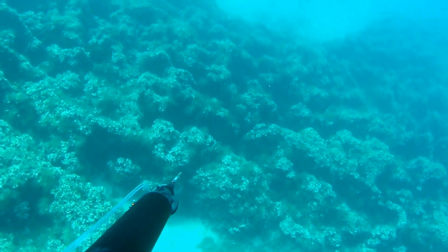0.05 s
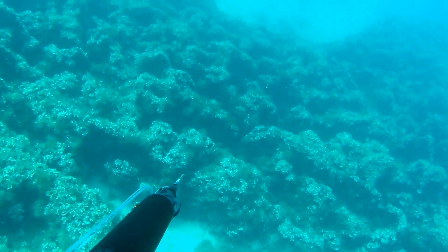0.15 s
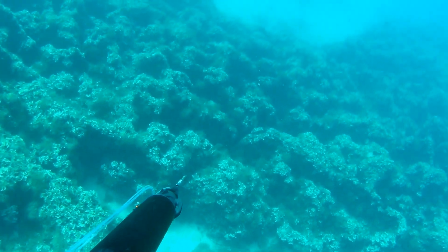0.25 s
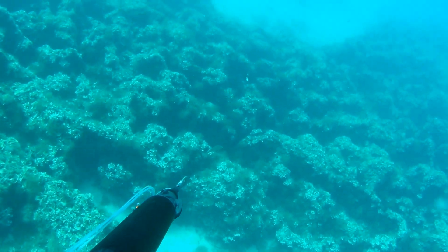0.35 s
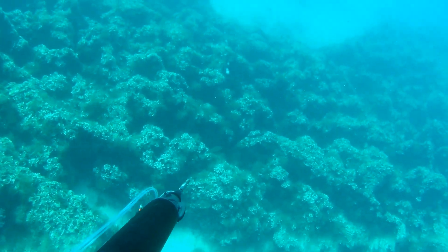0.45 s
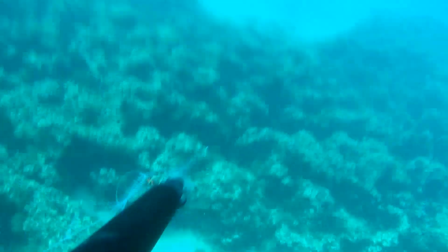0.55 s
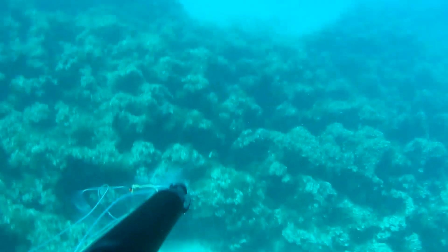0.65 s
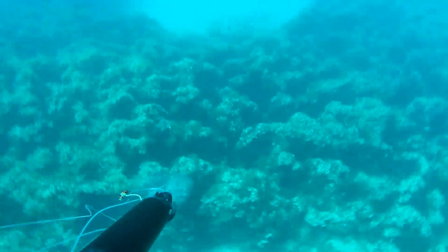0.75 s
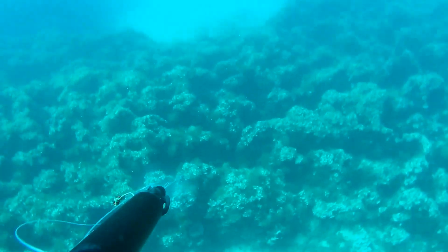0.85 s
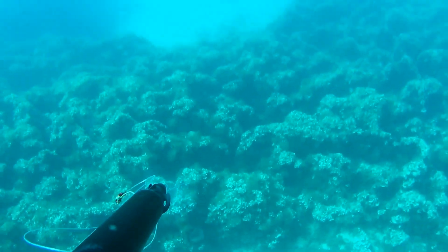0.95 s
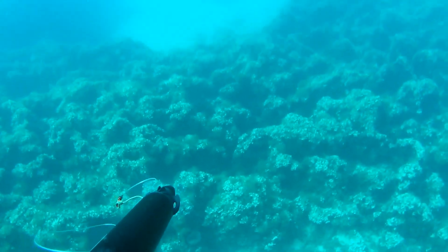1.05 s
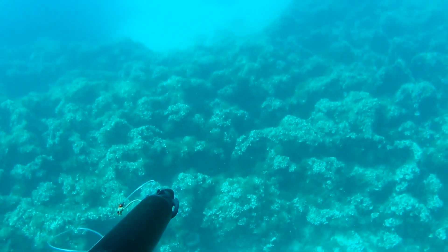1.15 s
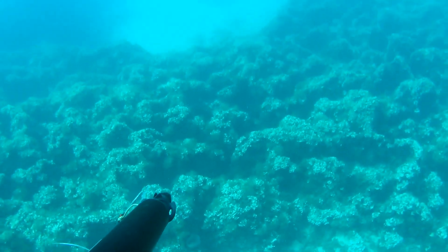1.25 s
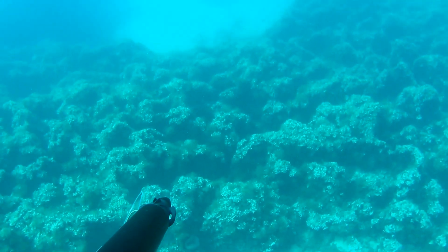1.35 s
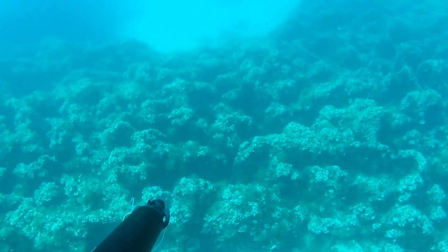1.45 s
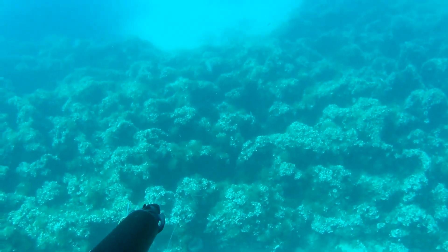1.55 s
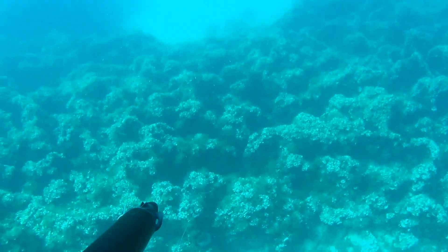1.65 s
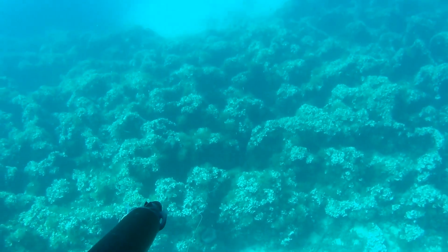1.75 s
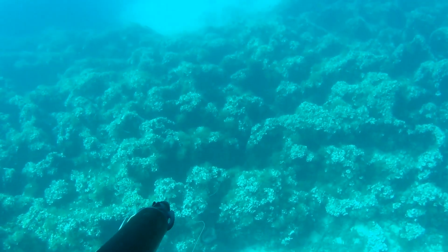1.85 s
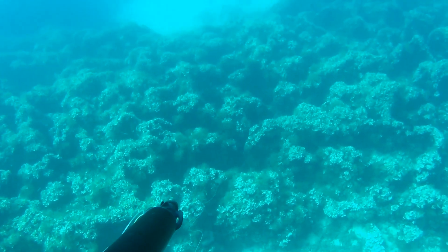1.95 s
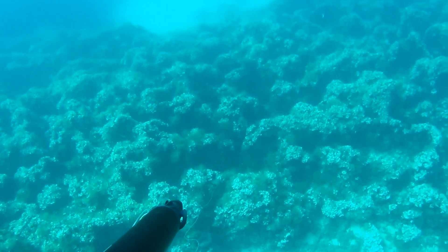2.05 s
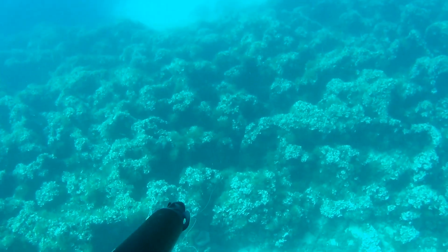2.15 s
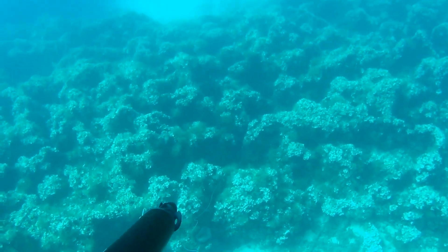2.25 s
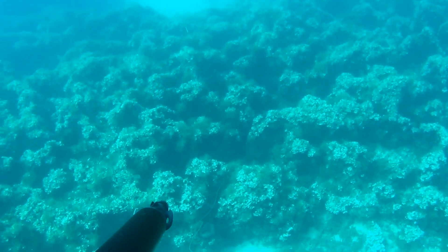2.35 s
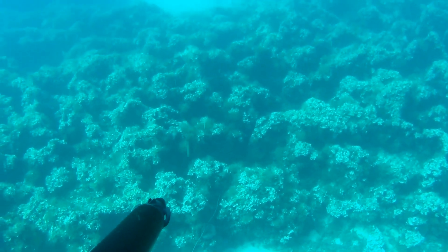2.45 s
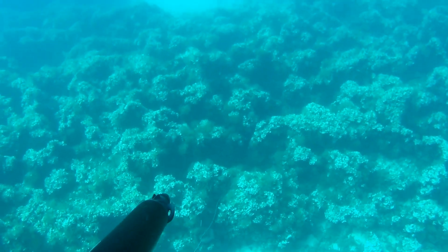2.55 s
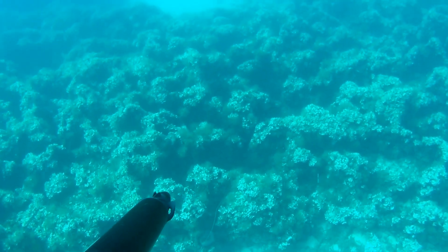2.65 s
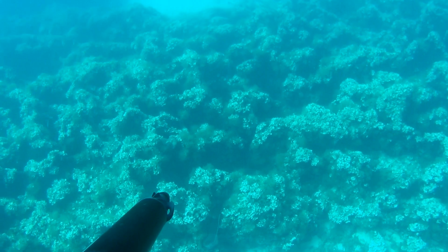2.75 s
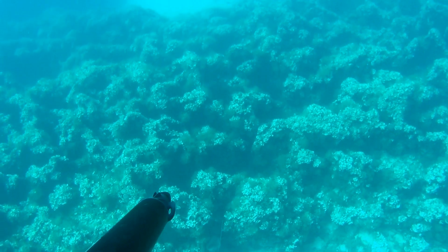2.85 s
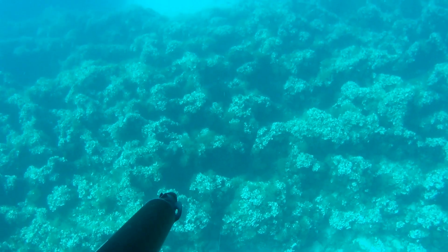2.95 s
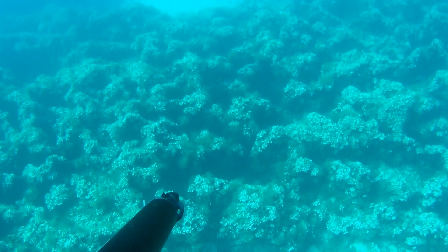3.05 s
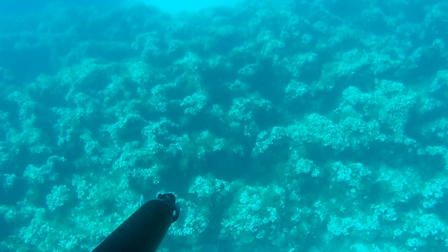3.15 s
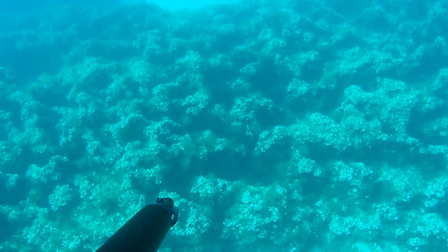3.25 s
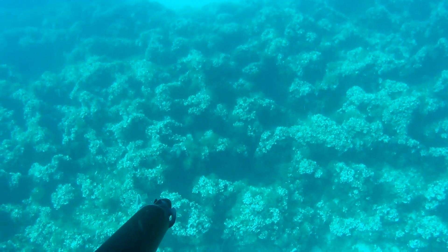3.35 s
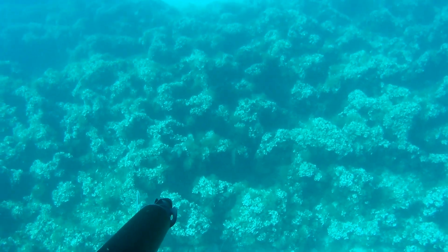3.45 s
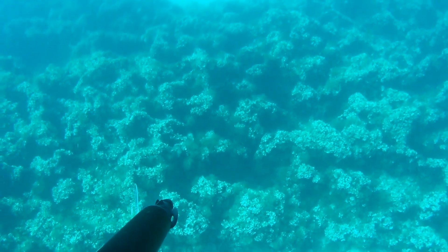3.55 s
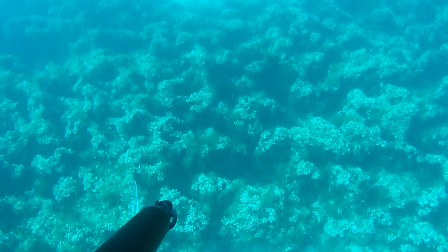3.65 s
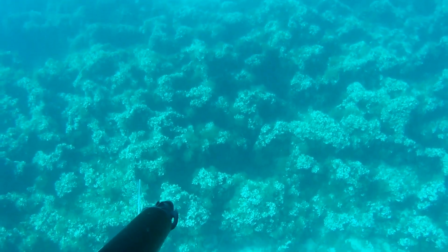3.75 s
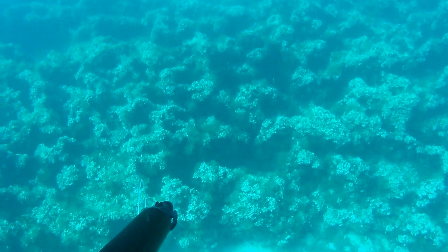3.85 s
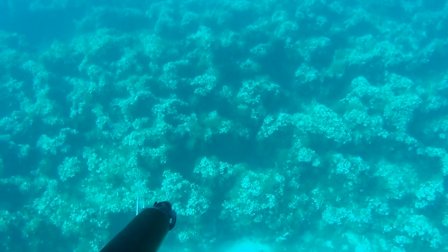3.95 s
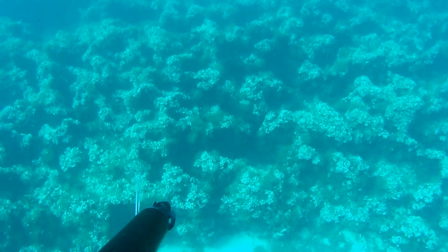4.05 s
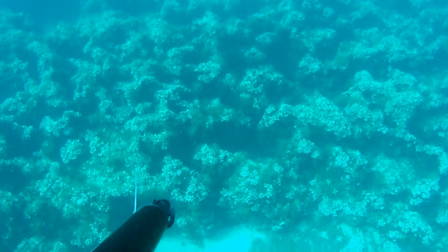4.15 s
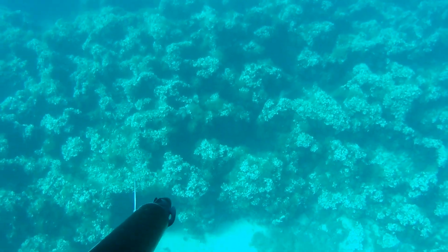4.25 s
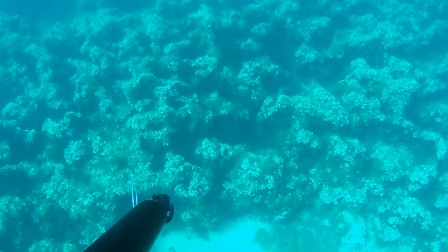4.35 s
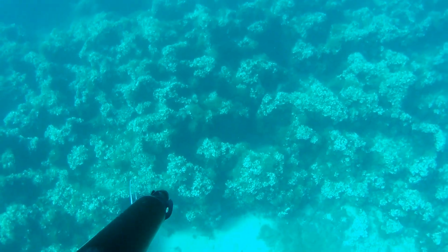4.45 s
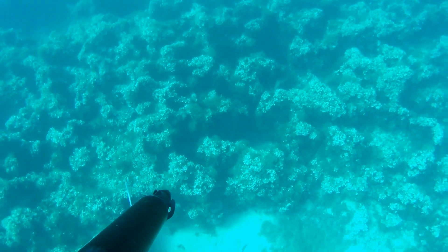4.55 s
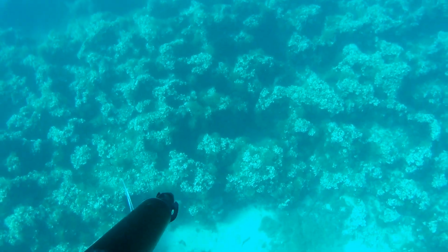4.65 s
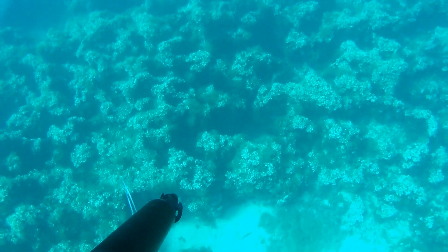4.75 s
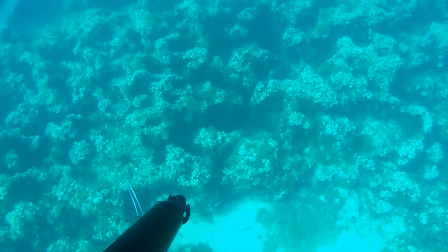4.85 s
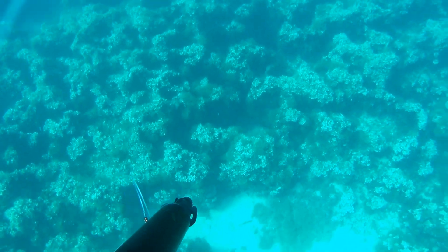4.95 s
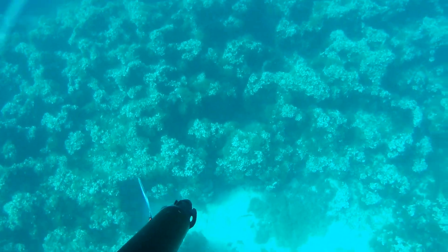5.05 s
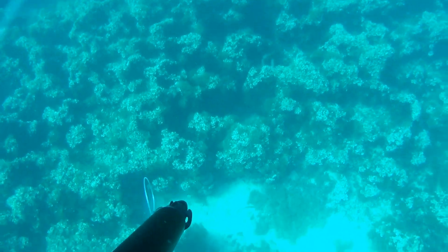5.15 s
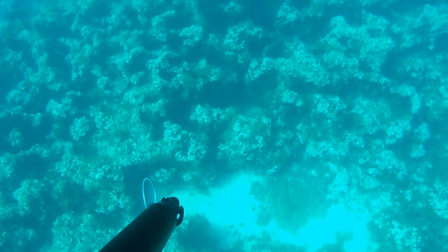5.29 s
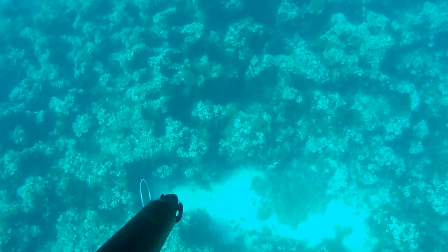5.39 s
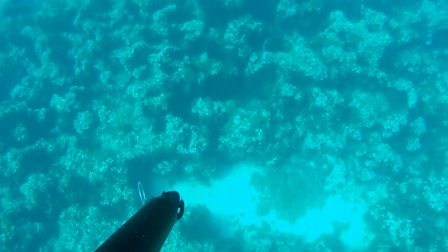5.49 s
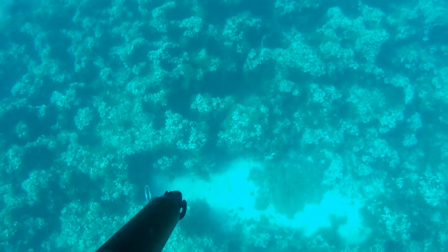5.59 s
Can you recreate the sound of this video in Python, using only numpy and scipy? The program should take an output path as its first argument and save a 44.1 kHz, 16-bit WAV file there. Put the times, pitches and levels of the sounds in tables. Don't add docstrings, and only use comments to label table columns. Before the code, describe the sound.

Underwater, a speargun fires with a heavy, loud clack and brief metallic ring, then a smaller snap, leaving quiet rumble, gurgles and crackling.

```python
import sys
import numpy as np
from scipy import signal
from scipy.io import wavfile
from scipy.ndimage import uniform_filter1d

SR = 44100
rng = np.random.default_rng(int(sys.argv[2]) if len(sys.argv) > 2 else 0)


def volts_from_decibels(level):
    exponent = np.asarray(level, float) / 20
    return 10 ** exponent


def output_pcm(signal):
    pcm = np.clip(np.atleast_2d(signal).T, -1, 1) * 32767
    wavfile.write(sys.argv[1], SR, np.round(pcm).astype(np.int16))


N = 247842
EDGE_HZ = 11250

# frequency in Hz, likeness from 0 to 1,
# phase lead of the right in radians, left-right level in dB.
PORT_PAIR = [(40, .7, -.9, -3), (120, .5, -.3, -2), (240, .5, 1.3, 1), (500, .6, 2.9, 1),
             (1250, .6, 2.9, 1), (1700, .8, 6.1, -1), (2400, .2, 6.3, 1), (4200, .3, 5, 1),
             (5400, .7, 4.9, 1.5), (6300, .7, 5.4, 1), (6900, .7, 6.1, 1), (11000, .55, 6.3, 0)]


def evened(x):
    return x / np.sqrt(np.mean(x ** 2) + 1e-20)


def read(points, hz, axis=1):
    points = np.transpose(points)
    return np.interp(np.log(hz + 1), np.log(points[0] + 1), points[axis])


def curves(rows):
    s, *columns = np.transpose(rows)
    return [np.interp(np.arange(N) / SR, s, c) for c in columns]


def add(mix, s, sound):
    part = mix[:, round(s * SR):][:, :sound.shape[1]]
    part += sound[:, :part.shape[1]]


def sides(pan_db):
    return volts_from_decibels(np.array([[pan_db / 2], [-pan_db / 2]]))


def mode(hz, t60, rise, length=.1, apart=1.0, ahead=0):
    t = np.arange(round(length * SR)) / SR
    port_phase = np.angle(np.exp(1j * read(PORT_PAIR, hz, axis=2)))
    lead = np.array([[0], [ahead + apart * port_phase]])
    envelope = volts_from_decibels(-60 * t / t60) * (1 - np.exp(-t / rise))
    return np.sin(2 * np.pi * hz * t + lead) * envelope


def noise(colour, length=N, size=1024, patchy_db=1.5):
    frames = 4 * length // size + 5
    hz = np.fft.rfftfreq(size, 1 / SR)
    hz = hz[hz < min(colour[-1][0], EDGE_HZ + SR / 50)]
    a, b, c, d, patches = rng.standard_normal((frames, len(hz), 5), dtype=np.float32).T
    patches = uniform_filter1d(patches, size=6, axis=0)
    patches = evened(uniform_filter1d(patches, size=8, axis=1))
    same = np.clip(read(PORT_PAIR, hz), 0, .95)[:, None]
    turn = np.exp(1j * read(PORT_PAIR, hz, axis=2))[:, None]
    tilt = volts_from_decibels(read(PORT_PAIR, hz, axis=3) / 2)[:, None]
    left = a + 1j * b
    right = same * turn * left + np.sqrt(1 - same ** 2) * (c + 1j * d)
    z = np.array([left * tilt, right / tilt])
    z *= volts_from_decibels(read(colour, hz)[:, None] + patchy_db * patches) / np.sqrt(1 + same * turn.real)
    z = np.pad(z, ((0, 0), (0, size // 2 + 1 - len(hz)), (0, 0)))
    pair = signal.istft(z, nperseg=size, noverlap=3 * size // 4)[1][:, :length]
    return pair / pair.mean(0).std()


def narrowed(pair, width):
    middle = pair.mean(0)
    return middle + width * (pair - middle)


def strokes(rows):
    s, db, hold, t60 = np.transpose(rows)[:, :, None]
    t = np.arange(2 * SR) / SR - s
    rise_db = 2202 * np.maximum(-t, 0)
    fall_db = 60 * np.maximum(t - hold, 0) / t60
    return volts_from_decibels(db - rise_db - fall_db).sum(0)


def whine(rows, waver_hz, flutter_db):
    hz, db = curves(rows)
    drift = uniform_filter1d(uniform_filter1d(rng.standard_normal((2, N)), size=900), size=900)
    drift = drift / drift.std()
    turns = 2 * np.pi * np.cumsum(hz + waver_hz * drift[0]) / SR + np.array([[0], [-.4]])
    return volts_from_decibels(db + flutter_db * drift[1]) * np.sqrt(2) * np.cos(turns)


def motor():
    # time in seconds, pitch in Hz, level in dB.
    lower_tone = [(0, 1715, -72.5), (1, 1712, -79), (1.6, 1717, -75.5), (2.1, 1712, -75), (2.3, 1712, -80),
                  (2.65, 1715, -76), (3.1, 1710, -74), (3.27, 1718, -74), (3.5, 1705, -70),
                  (3.8, 1696, -67.5), (4.2, 1703, -70.5), (4.58, 1700, -71), (4.75, 1702, -79),
                  (5.2, 1710, -79), (5.62, 1708, -84)]
    # time in seconds, pitch in Hz, level in dB.
    upper_tone = [(0, 2342, -89), (3, 2310, -85), (4.2, 2350, -87), (5, 2313, -79), (5.62, 2380, -80)]
    return whine(lower_tone, 1.2, 1.102) + whine(upper_tone, 25., 2.5)


def water():
    # frequency in Hz, density in dB per Hz.
    rumble_colour = [(15, -23), (30, 2.5), (65, -3), (105, 0), (160, -11), (300, -32.5), (1000, -68)]
    swish_colour = [(80, -38), (150, -11), (220, 3.5), (290, -2.5), (400, -15), (700, -26), (2000, -61)]
    rustle_colour = [(250, -21.5), (420, -3), (700, -5.5), (1200, -2.5), (1500, -3), (2600, -15),
                     (4000, -41)]
    hiss_colour = [(180, -26), (300, 0.5), (642, -9.5), (725, -6.5), (1290, -15.5), (1680, -4), (1840, -13),
                   (2340, -10), (2530, -14.5), (4720, -17.5), (5330, -14.5), (10600, -21.5), (11400, -26),
                   (14800, -62.5), (22000, -120)]
    # time in seconds, effort in dB.
    motion = [(0, -1.5), (.4, 0.5), (.8, -6), (1.4, -2), (2.2, -2), (2.75, 0.5), (3.5, 1), (3.9, -1),
              (4.45, 3), (4.7, 2.5), (5.1, 3), (5.62, 7)]
    # middle in seconds, length in seconds,
    # rumble change in dB, swish change in dB.
    surges = [(.39, 0.027, 8, -3), (0.903, 0.081, 12.5, 8), (1.123, 0.12, 3.5, 1), (1.35, 0.036, -4.5, 3),
              (1.601, 0.041, 4.5, -0.5), (1.821, 0.037, 3.5, 0.5), (1.908, 0.036, 1.5, 3.5),
              (2.088, 0.075, 0, 2.5), (2.302, 0.056, 2.5, -5.5), (2.561, 0.044, 1, 0.5),
              (3.638, 0.072, -3, -0.5), (4.07, 0.05, -2.5, -5), (4.54, 0.089, 2, 5.5),
              (4.824, 0.032, -4, 0.5), (4.983, 0.055, -4, 2.5), (5.38, 0.062, 2.5, -1),
              (5.5, 0.057, 1.5, 4)]
    effort_db = curves(motion)[0]
    s, length, *lift_db = np.transpose(surges)
    t = np.arange(0, N / SR, .002)
    swells = np.exp(-((t - s[:, None]) / length[:, None]) ** 2)
    rumble_db, swish_db = curves(np.transpose([t, *np.dot(lift_db, swells)]))
    rumble = volts_from_decibels(-62.5 + 0.55 * effort_db + rumble_db) * noise(rumble_colour, size=2048, patchy_db=1.0)
    swish = volts_from_decibels(-67.5 + 1.2 * effort_db + swish_db) * noise(swish_colour, patchy_db=1.5)
    rustle = volts_from_decibels(-70 + 0.82 * effort_db) * noise(rustle_colour, size=512, patchy_db=3.0)
    hiss = volts_from_decibels(-67.35) * noise(hiss_colour, size=512, patchy_db=1.8)
    return rumble + swish + rustle + hiss


def gurgles():
    # middle in seconds, half length in seconds, pitch in Hz, level in dB.
    gurgle_rows = [(0.905, 0.026, 107, -55), (1.255, 0.034, 410, -66.5), (1.634, 0.054, 58, -59),
                   (1.833, 0.05, 95, -58.8), (1.891, 0.041, 351, -65.4), (1.918, 0.034, 208, -59.5),
                   (2.824, 0.028, 225.5, -55), (2.829, 0.036, 308, -62.5), (3.223, 0.028, 313, -66),
                   (3.624, 0.038, 303.7, -61), (3.662, 0.057, 258.0, -61), (4.061, 0.036, 269.0, -64.5),
                   (4.308, 0.026, 232, -60), (4.44, 0.064, 97.6, -57.7), (4.517, 0.097, 199.0, -62),
                   (4.56, 0.049, 276.5, -54.5), (4.747, 0.049, 500, -63), (4.777, 0.03, 110, -54.5),
                   (4.829, 0.05, 413, -65), (4.964, 0.039, 234.5, -64), (4.991, 0.046, 150, -63.5),
                   (4.991, 0.074, 308, -62.5), (5.223, 0.064, 280.0, -65), (5.28, 0.063, 152.8, -60.5),
                   (5.313, 0.023, 192, -57.5), (5.32, 0.07, 385, -70), (5.345, 0.076, 102.6, -58),
                   (5.49, 0.033, 459, -64.5), (5.512, 0.048, 103, -51.5), (5.485, 0.04, 265, -52),
                   (5.575, .045, 262, -52), (5.5, .03, 325, -55), (4.66, .04, 235, -60),
                   (4.77, .025, 690, -63), (5.597, 0.023, 420, -69.4)]
    out, t = np.zeros((2, N)), np.arange(-.3, .3, 1 / SR)
    chances = rng.uniform(-1.12, 1, (len(gurgle_rows), 2))
    for (s, half, hz, db), (c, d) in zip(gurgle_rows, chances):
        wobble = 0.84 * np.sin(2 * np.pi * (18.6 + 4.5 * c) * t + np.pi * d)
        lead = np.array([[0], [0.4 * read(PORT_PAIR, hz, axis=2)]])
        note = np.sin(2 * np.pi * hz * t + wobble + lead)
        add(out, s + t[0], volts_from_decibels(db) * np.exp(-(t / half) ** 2) * note)
    return out


def taps():
    # start in seconds, peak level in dB, pitch in Hz, t60 in seconds.
    tap_rows = [(1.261, -53, 710, 0.027), (1.263, -45, 1180, 0.021), (1.572, -42.5, 1260, 0.031),
                (1.875, -41.5, 350, 0.026), (2.552, -51, 1750, 0.038), (2.674, -48.5, 62, 0.094),
                (2.776, -50, 1520, .025), (3.221, -49.5, 1690, 0.031), (3.088, -45, 1590, 0.018),
                (3.2, -49.5, 1083, 0.055), (3.633, -46, 626, 0.041), (3.634, -44, 1850, 0.038),
                (3.835, -55, 725, 0.12), (4.25, -47.5, 1640, 0.055), (4.308, -52.5, 121, 0.046),
                (4.31, -52, 2280, 0.029), (4.488, -49, 1380, 0.032), (4.489, -43, 1760, 0.023),
                (4.611, -53.5, 247, 0.29), (4.68, -54, 533, 0.14), (4.729, -53, 572, 0.11),
                (4.769, -48.5, 680, 0.062), (4.77, -50, 494, 0.049), (4.814, -55.5, 430, 0.074),
                (5.01, -52, 727, 0.059), (5.051, -47, 1670, 0.035), (5.1, -49, 1310, .035),
                (5.238, -52, 1210, .02), (5.58, -53, 2300, .03), (5.599, -53, 1480, .04),
                (5.408, -38.5, 1470, 0.023), (5.481, -43, 1470, 0.062)]
    out = np.zeros((2, N))
    for (s, db, hz, t60), chance in zip(tap_rows, rng.uniform(-0.93, 1, (len(tap_rows), 4))):
        pitches = hz * (1 + 0.123 * (chance - chance.mean()))
        cluster = sum(mode(pitch, t60, 0.0023, length=0.14, apart=0.63) for pitch in pitches)
        add(out, s, volts_from_decibels(db - 7.0) * cluster)
    return out


def shrimp():
    # start in seconds, peak level in dB, low part in dB, middle part in dB.
    near_snaps = [(0.0688, -44.5, -9.5, -14), (.178, -45, -12, -16), (0.9657, -52.5, 8, 0.5),
                  (1.0148, -37.5, -18, -16.5), (1.0765, -45.5, -2.5, -11), (1.4842, -40.5, -24, -17),
                  (1.5277, -40.5, -6, -10.5), (1.6064, -43.5, -22, -15), (1.6735, -40, -9, -14),
                  (2.1063, -47, -16, -16.5), (2.2284, -44, -21.5, -14.5), (2.247, -40, -10.5, -17.5),
                  (2.279, -39.5, -12, -14), (2.471, -37.5, -8.5, -9.5), (2.942, -54, -7, -9),
                  (2.9588, -56, 10.5, 4), (3.076, -44, -1, -17.5), (3.2993, -49, -22, -13),
                  (3.3495, -43.5, -1, -11.5), (3.6776, -39.5, -4.5, -8), (3.731, -44.5, -7, -8.5),
                  (3.762, -40, -5.5, -16), (3.844, -46, -11, -14), (3.9696, -46, -16, -19),
                  (4.1468, -42, -18, -15), (4.3853, -47, -7, -22), (4.697, -46.5, -1, -10.5),
                  (4.7084, -39, -8, -14.5), (5.145, -41.5, -7, -16), (5.4817, -47.5, -8, -10.5)]
    # start in seconds, peak level in dB.
    dull_snaps = [(0.235, -49.5), (0.8586, -56), (1.342, -57.5), (1.426, -52), (1.643, -50.5),
                  (1.9323, -52), (2.3338, -50.5), (2.3391, -50), (2.4513, -58.5), (2.503, -52.5),
                  (2.611, -58), (2.697, -53.5), (2.775, -51.5), (2.8412, -53), (3.042, -57), (3.0807, -50),
                  (3.166, -56), (3.2651, -51), (4.063, -52.5), (4.246, -52), (4.4558, -59), (4.47, -50.5),
                  (4.892, -52.5), (5.238, -45.5), (5.5266, -55)]
    # start in seconds, peak level in dB,
    # low part in dB, middle part in dB, left-right level in dB.
    gun_ticks = [(.431, -35, 0, -16, 3), (.4755, -34, -16, -8, 3), (.5437, -34.5, -19, -11, 4),
                 (.6177, -37, -30, -14.5, 1), (.7097, -50, 1, -7, -2), (.7152, -31.5, -15, -25, 2),
                 (.7647, -48, -4, -14, -3)]
    # frequency in Hz, t60 in seconds, level in dB.
    shell_modes = [
        [(1150, 0.0028, 12), (1644, 0.014, 2), (2219, 0.0072, -1)],
        [(2750, 0.0078, 6), (3100, 0.0045, 5.5), (3520, 0.0054, 8), (3900, 0.0035, 5.5), (4240, 0.0037, 7)],
        [(5440, 0.006, 0.5), (6470, 0.0041, 3.5), (7650, 0.0021, 5), (9050, 0.0024, -7), (10200, 0.0037, -11)],
    ]
    reef_pan_db = 3.5
    far_per_s, far_db, far_spread_db = 84, -68, 5.5
    at, size, low, middle = rng.random((round(far_per_s * N / SR), 4)).T
    crackle_db = far_db - far_spread_db * np.log(size + 0.042)
    far = np.transpose([at * N / SR, crackle_db, 14.0 * low - 13., 11.0 * middle - 17., reef_pan_db + 0 * at])
    near = [(*row, reef_pan_db) for row in near_snaps]
    dull = [(*row, -1.5, -9, reef_pan_db) for row in dull_snaps]
    s, db, low_db, middle_db, pan_db = np.transpose([*gun_ticks, *near, *dull, *far])
    out = np.zeros((2, N))
    places = ((s + 0.00065) * SR).astype(int).clip(0, N - 1)
    for modes, part_db in zip(shell_modes, (low_db, middle_db, 0)):
        weights = rng.standard_normal((len(s), len(modes))).T
        for (hz, t60, level_db), c in zip(modes, weights):
            train = np.zeros((2, N))
            pulse_db = db - 0.57 + level_db + part_db + 1.7 * c
            train[:, places] = volts_from_decibels(pulse_db + np.outer([.5, -.5], pan_db))
            out += signal.oaconvolve(train, mode(hz, t60, 0.00053, length=0.079), axes=1)[:, :N]
    return out


def splash():
    # start in seconds, level in dB, hold in seconds, t60 in seconds.
    sprays = [
        (.505, -50, .01, .16),
        (.545, -57, .03, .18),
        (.632, -58, .02, .08),
        (.722, -55, .008, .09),
        (.74, -64, .02, .12),
    ]
    # frequency in Hz, density in dB per Hz.
    fizz_colour = [(400, -20), (900, -3), (1550, 0), (2400, -5), (3300, -13), (4700, -20), (6500, -16),
                   (8000, -23), (11000, -32)]
    fizz = strokes(sprays)[:SR] * noise(fizz_colour, length=SR, size=256, patchy_db=4.0)
    return np.pad(fizz, ((0, 0), (0, N - SR)))


def ring():
    modes_hz = [183, 257, 328, 405, 599, 760, 921, 1073, 1280, 1400, 1518, 1681, 1790, 1900, 2011, 2236,
                2391, 2580, 4080, 6550]
    # level in dB, t60 in seconds, left-right level in dB,
    # phase lead of the right in radians.
    mode_rows = [(-18.5, 0.33, -0.5, 1.8), (-25.5, 0.71, -8.5, 1.76), (-30, 0.67, -15, 0.97),
                 (-35, .3, 2, -1), (-34.5, 0.65, 1, 2), (-40.5, .2, -2, 1), (-31.5, .55, -4.5, 0.9),
                 (-31.5, .42, 10, 1.4), (-41, 0.24, -3, 2), (-40.5, .25, -9.5, -0.5),
                 (-26.5, 0.31, -11, 3.5), (-45, .5, -0.5, 1), (-25, 0.36, 8, 2), (-36, .15, -2, 0),
                 (-45.5, .25, 13, 1.1), (-48, 0.34, 10, -1), (-49, .35, 11.5, 2), (-49.5, .22, 10, .5),
                 (-43.5, 0.21, -8, 1.06), (-56, .2, 0, 1)]
    start_s, rise_s = .505, .028
    damp_s, damp_over_hz, damp_db = .59, 1600, -9
    out = np.zeros((2, N))
    shakes = rng.standard_normal((len(mode_rows), round(.8 * SR)))
    for hz, (db, t60, pan_db, ahead), shake in zip(modes_hz, mode_rows, shakes):
        flutter_db = 1.5 * evened(uniform_filter1d(uniform_filter1d(shake, size=500), size=500))
        t = np.arange(len(shake)) / SR + start_s
        flutter_db += damp_db * (hz > damp_over_hz) * np.clip((t - damp_s) / .012, 0, 1)
        tone = mode(hz, t60, rise_s, length=.8, apart=0, ahead=ahead)
        add(out, start_s, volts_from_decibels(db + flutter_db) * sides(pan_db) * tone)
    return out


def bands():
    # start in seconds, level in dB, hold in seconds, t60 in seconds.
    whips = [
        (.435, -27.5, 0.0013, 0.049),
        (.458, -15.5, 0.027, .04),
        (.509, -15.5, 0.006, 0.04),
        (.523, -14.5, 0.017, .055),
        (.6, -37.5, 0.018, 0.49),
        (.9, -65, .001, 0.63),
    ]
    # start in seconds, level in dB, hold in seconds, t60 in seconds.
    churns = [
        (.435, -35.5, .001, 0.4),
        (.46, -16.5, 0.004, 0.32),
        (.51, -26, 0.054, 0.16),
        (.64, -42, 0.081, 0.23),
        (.9, -62, 0.094, 1),
    ]
    # frequency in Hz, density in dB per Hz.
    churn_colour = [(18, -57.5), (50, -26), (66, -3.5), (105, -6.5), (170, -2.5), (330, -14), (626, -27),
                    (1000, -31), (1600, -36.5), (2300, -45.5), (4200, -65), (11000, -77.5)]
    # time in seconds, rate in Hz.
    flap_rate = [
        (.435, 173.5),
        (.455, 103.5),
        (.55, 103.5),
        (.585, 69.4),
        (1.15, 70.3),
    ]
    hz = curves(flap_rate)[0][:2 * SR]
    turns = 2 * np.pi * np.cumsum(hz) / SR + np.array([[2.75], [3.0]])
    stroke = np.cos(turns)
    stroke = stroke + 0.36 * np.cos(2 * turns + np.array([[2.2], [2.9]]))
    stroke = stroke + 0.15 * np.cos(3 * turns + 0.26)
    churn = strokes(churns) * noise(churn_colour, length=2 * SR, size=512, patchy_db=1.5)
    sound = strokes(whips) * np.sqrt(2) * stroke * sides(-4.5) + narrowed(churn, 0.85)
    return np.pad(sound, ((0, 0), (0, N - 2 * SR)))


def knocks():
    # frequency in Hz, density in dB per Hz.
    crack_colour = [(200, -26.5), (700, 17), (1500, 8), (2000, -2.5), (2600, -2), (3500, -6.5), (4300, -8),
                    (4700, -14), (5500, -11.5), (6700, -18.5), (8500, -20), (11000, -30)]
    # start in seconds, peak level in dB, pitch in Hz,
    # t60 in seconds, crack level in dB.
    trigger = [(0.4221, -36, 600, 0.015, -53), (0.4319, -18, 653, 0.027, -37),
               (.4325, -36, 2270, 0.0095, -42), (0.4349, -20, 814, 0.016, -45),
               (.4415, -24, 784, 0.017, -59)]
    release = [(.4655, -23, 180, .12, -60), (.456, -21.5, 64, .16, -59.5), (0.4572, -21.5, 324, 0.072, -42),
               (.4755, -12, 414, 0.012, -28), (0.4779, -25, 1170, .028, -43.5),
               (0.4892, -39, 2900, .012, -24.5), (0.4946, -28, 900, 0.011, -22.5)]
    slam = [(.5009, -8.5, 480, .02, -15), (.5008, -14, 1300, .02, -30), (.5137, -19, 220, .045, -30),
            (0.5121, -30, 1060, 0.03, -42.5), (.5145, -21, 470, 0.03, -39.5),
            (0.5196, -20, 330, .025, -50.5)]
    slam_left = [(.5033, -15, 640, .058, -18), (.5028, -24, 1285, .02, -30), (.5065, -33, 830, .035, -28),
                 (.5075, -34, 2245, .03, -37), (.5022, -32, 2620, .014, -40)]
    slam_right = [(.5028, -17, 1480, .018, -17), (.5025, -36, 3150, .014, -30),
                  (.5052, -20, 640, .028, -33), (.51, -30, 1495, .04, -35), (.5027, -36, 4150, .012, -40)]
    rebound = [(.5445, -20, 190, .05, -60), (0.543, -43, 2360, 0.019, -38), (0.5486, -10, 364, 0.018, -29),
               (0.5494, -19, 1330, 0.012, -29), (.5515, -25, 960, .016, -45), (.645, -34, 420, 0.027, -50),
               (0.643, -41, 1370, 0.024, -43), (.677, -42, 560, 0.025, -73)]
    line_snap = [(.7145, -33, 2000, 0.014, -38), (.7165, -22.5, 1620, .014, -38),
                 (.7157, -33, 1220, 0.018, -50), (.7165, -37.5, 2950, 0.0089, -53),
                 (.7155, -49, 4200, .014, -60), (.716, -48, 5475, .012, -60), (.7155, -46, 6697, .02, -60),
                 (.739, -62, 6560, .05, -55), (.719, -46, 760, 0.03, -60), (.7235, -40, 1300, .015, -49),
                 (.7262, -40, 1630, 0.012, -39), (.7265, -43, 2120, .016, -60), (.729, -46, 1390, .03, -60),
                 (.736, -54.5, 965, .17, -66), (.739, -52, 1570, .06, -62), (.744, -65, 2090, .1, -66),
                 (.735, -64, 2430, .07, -66)]
    blows = (trigger, release, slam, slam_left, slam_right, rebound, line_snap)
    blow_pan_db = [-3, -2, -.6, 6, -7, -1.5, 2]
    blow_apart = [0.6, .6, 0.05, 0.62, .5, 0.23, 0.18]
    blow_rise_s = [.0008, .0014, .0004, .0007, .0007, .0014, .0014]
    out, t = np.zeros((2, N)), np.arange(1500) / SR
    grit = narrowed(noise(crack_colour, length=SR, size=256, patchy_db=0.0), 0.9)
    burst = volts_from_decibels(-60 * t / 0.017) + volts_from_decibels(-21.5 - 60 * t / 0.079)
    burst = burst * (1 - np.exp(-t / 0.00022))
    for blow, pan_db, apart, rise in zip(blows, blow_pan_db, blow_apart, blow_rise_s):
        for s, db, hz, t60, crack_db in blow:
            crack = grit[:, round(s * SR):][:, :len(t)] * burst
            add(out, s, sides(pan_db) * volts_from_decibels(crack_db - 3.0) * crack)
            add(out, s, sides(pan_db) * volts_from_decibels(db + 8.0) * mode(hz, t60, rise, apart=apart))
    return out


def scene():
    background = motor() + water() + gurgles() + taps() + shrimp()
    gun = splash() + ring() + bands() + knocks()
    return background + gun


def band_limit(x):
    return signal.sosfilt(signal.butter(12, 11950, fs=SR, output="sos"), x)


def record(dry):
    limited = dry / (1 + (abs(dry) / 1.05) ** 4) ** .25
    edge = signal.firwin(301, EDGE_HZ, window=("kaiser", 9), fs=SR)
    return band_limit(signal.oaconvolve(limited, edge[None], "same"))


dry = scene()
out = record(dry)
output_pcm(out)
```